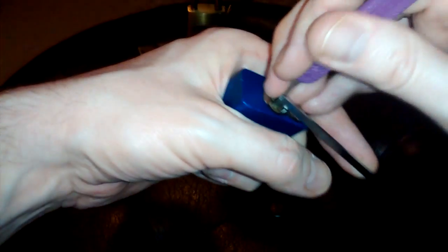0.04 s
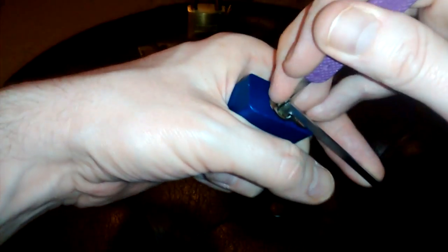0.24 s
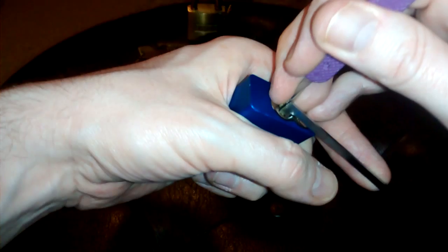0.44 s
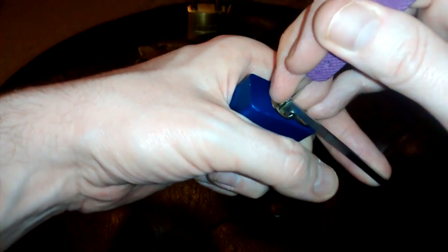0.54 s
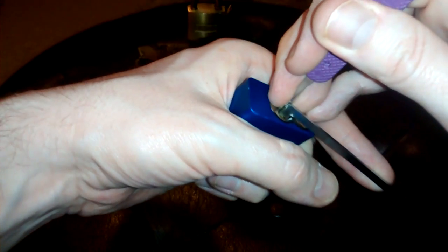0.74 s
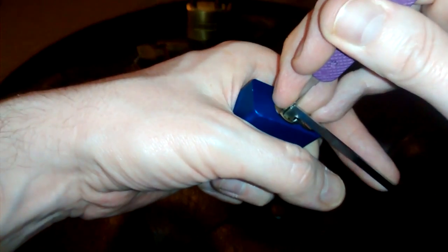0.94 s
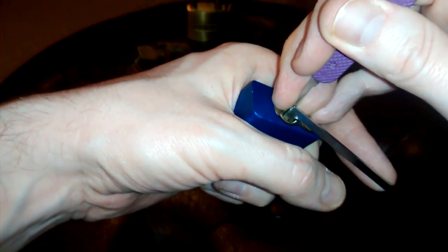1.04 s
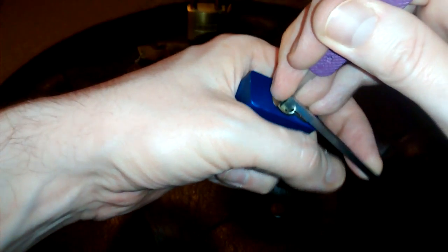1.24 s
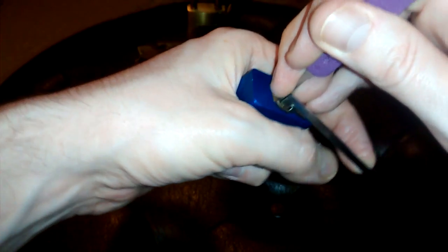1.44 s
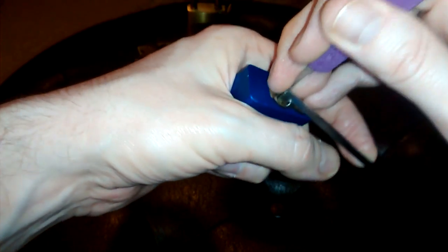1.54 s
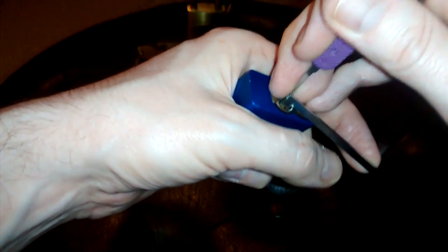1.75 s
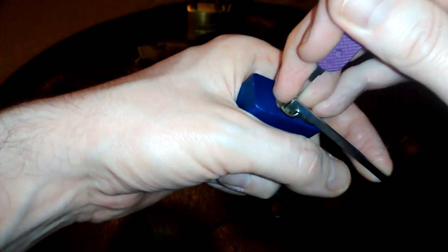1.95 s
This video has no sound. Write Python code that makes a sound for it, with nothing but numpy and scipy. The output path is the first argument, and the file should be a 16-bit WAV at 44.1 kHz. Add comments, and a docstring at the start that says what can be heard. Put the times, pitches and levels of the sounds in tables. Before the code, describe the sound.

Small metal clicks of a pick and tension tool inside a hand-held padlock. A faint flurry of ticks at 0.03-0.05 seconds, a barely audible tap at 0.14, then the loudest, bright snapping click at 0.22. Softer clicks follow at 0.70 and 0.99, and a faint one at 1.68. Brief damped ringing, slight room reverberation; steady soft hiss, low rumble and faint hum, close stereo microphone.

```python
"""Small metallic ticks and clicks ring briefly over hiss, low rumble and faint hums.
A pick and a tension tool tick against the pins of a small padlock held close to a two-port camera microphone.
Each click is a few contacts that ring the hand-damped lock; a wall and the room answer.
The camera widens its stereo by subtracting from each port a late copy of the other."""
import sys
import numpy as np
from scipy import signal
from scipy.fft import rfft, irfft
from scipy.io import wavfile
from scipy.ndimage import uniform_filter1d

SR = 44100
rng = np.random.default_rng(int(sys.argv[2]) if len(sys.argv) > 2 else 0)


def inscribe(sig):
    """Save sig as 16-bit PCM at rate SR to the path in sys.argv[1].

    A 1-D sig is mono; a 2-D sig holds one channel per row.
    Samples are clipped to [-1, 1] before scaling.
    """
    pcm = np.round(np.clip(np.atleast_2d(sig).T, -1, 1) * 32767)
    wavfile.write(sys.argv[1], SR, pcm.astype(np.int16))


def convert_level_to_amplitude(level_db):
    """Map a level in decibels to its linear amplitude factor."""
    exponent = np.asarray(level_db, float) / 20
    return 10 ** exponent


N = 88200  # two seconds of samples

# Hiss of each port before its slow drift. Each row: frequency in Hz, density in dB per Hz.
HISS_LEFT = [(8, -72.5), (60, -89), (110, -87.5), (300, -88), (600, -100), (1000, -100), (2000, -103),
             (3700, -101), (6000, -104), (16000, -105)]
HISS_RIGHT = [(8, -80), (60, -91), (110, -86.5), (300, -91.5), (600, -93), (1000, -100), (2000, -102),
              (3700, -106), (6000, -104), (16000, -105)]
# Room rumble reaching both ports, before the drift. Each row: frequency in Hz, density in dB per Hz.
RUMBLE_SPECTRUM = [(25, -70), (62, -67), (74, -61.5), (90, -67), (112, -80), (160, -82), (250, -88.5),
                   (400, -93), (1000, -110)]
# Low hums at the left port, before the drift. Each row: pitch in Hz, rms level in dB, width in Hz.
HUM_TONES = [(21.45, -54.5, 3.5), (45.7, -54, 1.385), (295.92, -66.5, 2.93)]
# Slow drift of the background. Each row: time in seconds, change of level in dB.
BACKGROUND_DRIFT = [(0, -1.62), (.3, 0.1), (.7, 0.21), (1.1, 0.26), (1.5, -0.84), (2, -1.72)]
# Colour of the room's answer. Each row: frequency in Hz, gain in dB.
ROOM_COLOUR = [(500, 7.5), (1500, -1.5), (2600, 9), (3250, 7), (3480, 0), (3800, -4), (4600, -4.5),
               (6000, -2), (9000, 3), (16000, -11.5)]
# Steel touching brass. Each row: start in seconds, ring level in dB, centre of the struck colour in Hz,
# spread of that colour in octaves, crack level in dB.
STEEL_CONTACTS = [(.0312, -53, 5540, 0.88, -64), (.0329, -44, 4850, 1.575, -54),
                  (.0344, -43, 6600, 0.95, -36.5), (.0368, -40.5, 5800, 0.64, -62.5),
                  (.0505, -45, 3900, 0.44, -70.5), (0.1387, -45.5, 1784, 0.94, -72),
                  (.2226, -26, 6470, 0.72, -27), (.2231, -20, 5890, 0.41, -25),
                  (.2233, -25, 1677, 0.706, -31.5), (.2242, -12, 3824, 0.366, -28.5),
                  (.7023, -34, 4880, 0.29, -38.5), (.7033, -36.5, 2380, 1.115, -46),
                  (.9902, -27, 4210, 0.449, -52), (.9909, -33, 3880, 0.36, -43),
                  (.9913, -38.5, 1180, 1.01, -43.5), (1.6766, -41.5, 4220, 0.55, -54.5),
                  (1.6783, -48.5, 1990, 1.8, -43), (1.6796, -38.5, 3950, 0.237, -48)]
# Ringing modes of the lock in the hand. Each row: frequency in Hz, level in dB, time to fall 60 dB in seconds.
LOCK_MODES = [(885, -4.5, 0.01795), (1223, -6.5, 0.01647), (1839, -6.5, 0.01204), (2220.5, -7, 0.0115),
              (2665, 3, 0.00646), (3493.6, -3, 0.0141), (3926, 2, 0.00618), (4257, -5.5, 0.01174),
              (4764, 2, 0.00814), (5389, -4.5, 0.00974), (6003, 0, 0.00742), (6397, -5.5, 0.0084),
              (8034, -16, 0.0041), (9635, 2, 0.0115)]
# Thin rings of the tension tool. Each row: frequency in Hz, level in dB, time to fall 60 dB in seconds.
TOOL_MODES = [(3413.6, -29.5, 0.223), (3555, -37, 0.171), (3898, -34, .12)]
# The lock as heard at the far (right) port. Each row: frequency in Hz, gain in dB.
FAR_PORT_COLOUR = [(300, -16), (1500, -5.5), (2500, -5.5), (3300, -25.5), (6000, -18), (16000, -39)]
# Colour of the left port's copy taken from the right. Each row: frequency in Hz, gain in dB.
LEFT_INTO_RIGHT = [(50, 2.5), (1200, 2.5), (2500, 0.76), (4000, -2.5), (16000, -2.5)]
# Colour of the right port's copy taken from the left. Each row: frequency in Hz, gain in dB.
RIGHT_INTO_LEFT = [(50, 1), (1200, -0.5), (2500, -6.83), (4000, -24), (5000, -47), (7000, -3), (16000, -14)]


def shape(x, table, lag_s=0.):
    """Colours a sound by (Hz, dB) points and delays it, by changing its spectrum."""
    hz = np.fft.rfftfreq(N, 1 / SR)
    points = np.array(table, float)
    db = np.interp(np.log(hz + 1), np.log(points[:, 0]), points[:, 1])
    delay = np.exp(-2j * np.pi * hz * lag_s)
    return irfft(rfft(x, N) * convert_level_to_amplitude(db) * delay, N)


def noise(table):
    """Random noise, first 0 dB per Hz at every frequency, then coloured to the table's density."""
    white = rng.standard_normal(N) * np.sqrt(SR / 2)
    return shape(white, table)


def fade(t, t60):
    """Exponential fade that falls 60 dB in t60 seconds."""
    return np.exp(-np.log(1000) * t / t60)


def rumble_at_ports():
    """One low noise reaches both ports, a little later and louder at the right."""
    right_db, right_lag_s = 0.5, 0.0002864
    rumble = noise(RUMBLE_SPECTRUM)
    flat = [(20, right_db), (SR / 2, right_db)]  # same gain at all frequencies
    return rumble, shape(rumble, flat, right_lag_s)


def hums():
    """Low sine tones whose phase wanders at random, which blurs each pitch a little."""
    t = np.arange(N) / SR
    out = np.zeros(N)
    for hz, db, width in HUM_TONES:
        drift = np.cumsum(rng.standard_normal(N)) * np.sqrt(2 * np.pi * width / SR)
        smooth_drift = uniform_filter1d(drift, size=900)  # averaged over about 20 ms
        out += convert_level_to_amplitude(db) * np.sqrt(2) * np.sin(2 * np.pi * hz * t + smooth_drift)
    return out


def background_level():
    """Slow drift of the background, as a gain for every sample."""
    drift = np.array(BACKGROUND_DRIFT)
    return convert_level_to_amplitude(np.interp(np.arange(N) / SR, drift[:, 0], drift[:, 1]))


def room(x):
    """One wall echo and a diffuse random tail that builds up in a few milliseconds."""
    tail_t60_s, build_up_s, wall_delay_s = 0.455, 0.0029, 0.0175
    tail_db, wall_db = -17.5, -25  # before the room's colour
    t = np.arange(N) / SR
    tail = rng.standard_normal(N) * fade(t, tail_t60_s) * (1 - np.exp(-t / build_up_s))
    tail = tail * convert_level_to_amplitude(tail_db) / np.sqrt(np.sum(tail ** 2))
    diffuse = shape(signal.fftconvolve(x, tail)[:N], ROOM_COLOUR)
    echo = convert_level_to_amplitude(wall_db) * shape(x, ROOM_COLOUR, wall_delay_s)
    return diffuse + echo


def lock():
    """Every contact pushes the modes near its colour into fading rings, and spits a short bright crack."""
    rise_s = 0.000248  # time constant of a contact's push
    scatter_db = 1.2  # random spread of each mode's level
    crack_hz, crack_t60_s = 7620, 0.0149
    out = np.zeros(N)
    t = np.arange(SR // 4) / SR
    modes = np.array(LOCK_MODES + TOOL_MODES, float)
    mode_hz, mode_db, mode_t60 = modes[:, :1], modes[:, 1], modes[:, 2:]
    signs = (-1.) ** np.arange(len(modes))[:, None]  # every other mode starts downwards
    crack_filter = signal.butter(4, crack_hz, "high", fs=SR, output="sos")
    chances_db = scatter_db * rng.standard_normal((len(STEEL_CONTACTS), len(modes)))
    for (start_s, db, centre_hz, spread, crack_db), chance_db in zip(STEEL_CONTACTS, chances_db):
        distance = np.log2(modes[:, 0] / centre_hz) / spread  # in units of the spread
        gain = convert_level_to_amplitude(mode_db - 7.45 * distance ** 2 + chance_db)
        # The ring may start between two samples.
        late = np.maximum(t - (start_s * SR % 1) / SR, 0)
        rings = signs * gain[:, None] * np.sin(2 * np.pi * mode_hz * late) * fade(late, mode_t60)
        ring = rings.sum(0) * (1 - np.exp(-late / rise_s))
        crack = signal.sosfilt(crack_filter, rng.standard_normal(len(t))) * fade(t, crack_t60_s)
        i = int(start_s * SR)
        out[i:i + len(t)] += convert_level_to_amplitude(db) * ring + convert_level_to_amplitude(crack_db) * crack
    return out


def scene():
    """Sound at the two ports: the clicks and the room's answer over the background."""
    far_port_lag_s = 0.00005
    extra_room_db = -2  # a second room answer, with its own random tail, at the right port
    clicks = lock()
    left_rumble, right_rumble = rumble_at_ports()
    wet = clicks + room(clicks)
    level = background_level()
    left = wet + level * (noise(HISS_LEFT) + left_rumble + hums())
    far = shape(wet, FAR_PORT_COLOUR, far_port_lag_s) + convert_level_to_amplitude(extra_room_db) * room(clicks)
    right = far + level * (noise(HISS_RIGHT) + right_rumble)
    return np.array([left, right])


def widen(dry):
    """Widens the stereo: each side loses a late, coloured copy of the other."""
    right_copy_lag_s, left_copy_lag_s = 0.00038496, 0.00032684
    dull_hz = 5404  # low-pass on the left port's copy
    left, right = dry
    dull_left = signal.sosfilt(signal.butter(4, dull_hz, fs=SR, output="sos"), left)
    wide_left = left - shape(right, RIGHT_INTO_LEFT, right_copy_lag_s)
    wide_right = right - shape(dull_left, LEFT_INTO_RIGHT, left_copy_lag_s)
    return np.array([wide_left, wide_right])


def band_limit(x):
    """A steep low-pass at the top of the band."""
    return signal.sosfilt(signal.butter(12, 16640, fs=SR, output="sos"), x)


def record(dry):
    """The camera widens the stereo and a steep low-pass cuts the top."""
    top_hz = 15500
    top_cut = signal.ellip(10, 0.2, 50, top_hz, fs=SR, output="sos")  # 0.2 dB ripple, 50 dB cut
    mix = signal.sosfilt(top_cut, widen(dry))
    return band_limit(mix)


dry = scene()
out = record(dry)
inscribe(out)
```